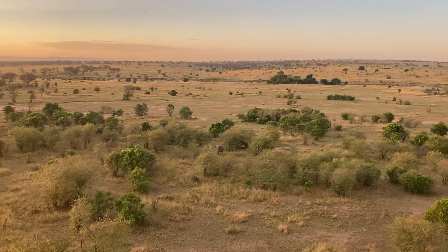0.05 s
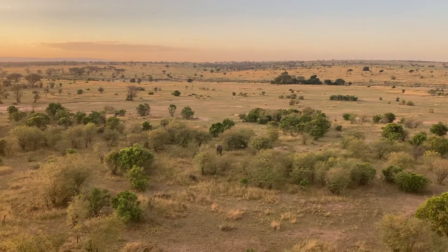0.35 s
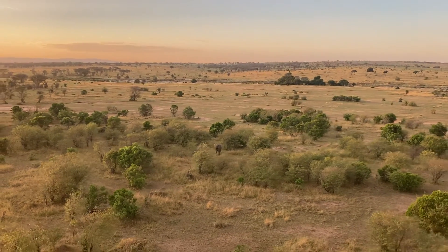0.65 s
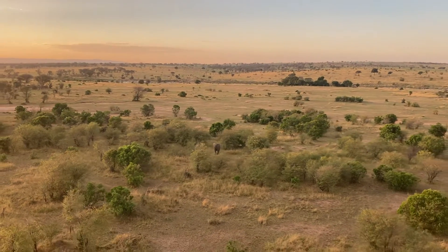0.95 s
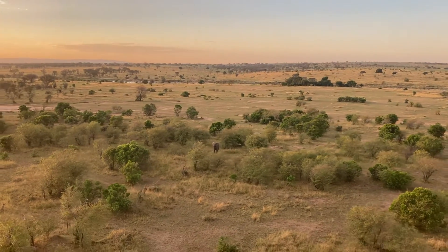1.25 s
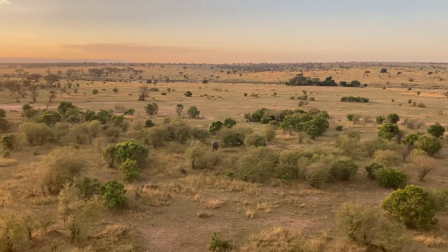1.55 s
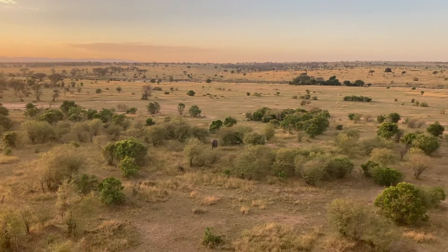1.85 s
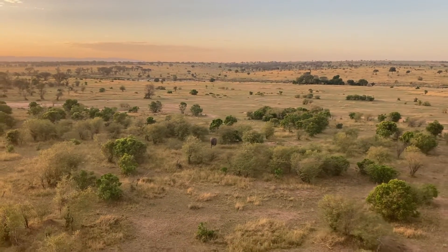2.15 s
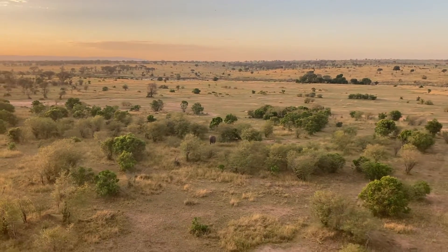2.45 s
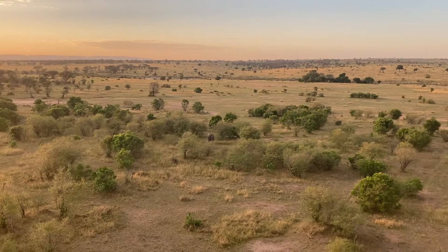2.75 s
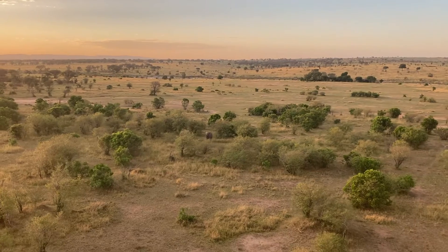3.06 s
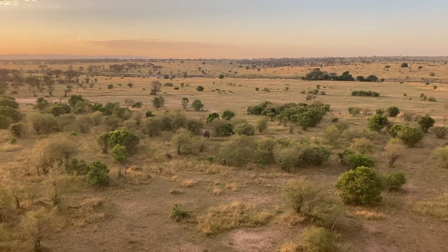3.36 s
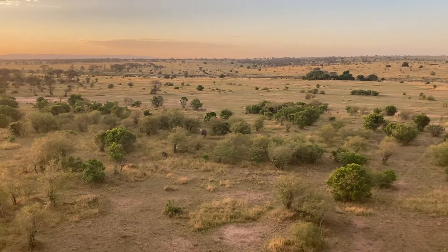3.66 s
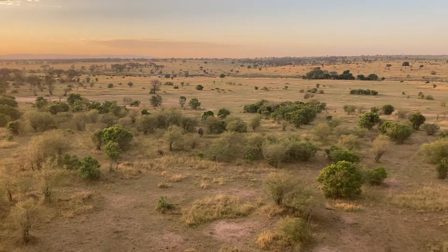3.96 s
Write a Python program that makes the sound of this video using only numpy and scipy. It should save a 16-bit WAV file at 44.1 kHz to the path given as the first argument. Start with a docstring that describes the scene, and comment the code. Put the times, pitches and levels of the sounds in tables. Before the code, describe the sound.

A loud, low gas burner roar builds with hissing and a few hollow pops, close above a balloon basket outdoors. Before it come a soft fluttering pilot flame, a brief creak, light ticks and a spitting valve.

```python
"""A hot-air balloon's main burner opens overhead: the gas jet hisses, catches with a few pops and swells
into a steady, low, turbulent roar. Before that, as the basket drifts over open grassland, the pilot
flame murmurs and flutters, the wicker slips with a creak, a metal fitting ticks, and a valve snaps
and spits gas."""
import sys
import numpy as np
from scipy import signal
from scipy.fft import rfft, irfft
from scipy.io import wavfile
from scipy.ndimage import uniform_filter1d

SR = 44100
rng = np.random.default_rng(int(sys.argv[2]) if len(sys.argv) > 2 else 0)


def wrap_up_sound(samples):
    """Save the sound to the file named by the first command line argument, as 16-bit audio."""
    columns = np.atleast_2d(samples).T
    # keep every value between -1 and 1, then stretch to whole-number steps
    tamed = np.clip(columns, -1, 1)
    steps = np.round(tamed * 32767).astype(np.int16)
    wavfile.write(sys.argv[1], SR, steps)


N = 176400
T = np.arange(N) / SR
FREQS = np.maximum(np.fft.rfftfreq(N, 1 / SR), 1)

# left-right coherence of pilot flame and basket knock: freq_hz, coherence
NEAR_COHERENCE = [(60, 0.59), (140, 0.84), (260, 0.96), (500, 0.62), (1100, 0.28), (1600, 0.34),
                  (6000, 0.27)]
# their left-side phase lead: freq_hz, lead_rad
NEAR_LEAD = [(90, 0.4), (250, 0.68), (480, 1), (900, 3), (1400, -2.5), (2100, 7), (3000, 8.5)]


def undb(db):
    """Decibels to gain."""
    return 10 ** (np.asarray(db) / 20)


def unit(x):
    """Scale to unit rms."""
    return x / np.sqrt(np.mean(x ** 2))


def over_hz(points):
    """Interpolate freq_hz, value points on a log-frequency axis."""
    hz, value = np.array(points, float).T
    return np.interp(np.log(FREQS), np.log(hz), value)


def swell(points):
    """Gain from time_s, level_db points; silent before the first."""
    time_s, level_db = np.array(points, float).T
    return undb(np.interp(T, time_s, level_db)) * (T >= time_s[0])


def noise(spectrum):
    """Unit-rms coloured noise, independent left and right."""
    return unit(irfft(rfft(rng.standard_normal((2, N))) * undb(over_hz(spectrum)), N))


def place(pair, coherence, lead):
    """Blend two independent noises into one stereo source."""
    a, b = rfft(pair)
    likeness = np.clip(over_hz(coherence), 0, .999)
    mid, side = a * np.sqrt((1 + likeness) / 2), b * np.sqrt((1 - likeness) / 2)
    return irfft(np.array([(mid + side) * np.exp(1j * over_hz(lead)), mid - side]), N)


def split(x, hz):
    """Parts below and above hz."""
    low = irfft(rfft(x) / (1 + (FREQS / hz) ** 6), N)
    return low, x - low


def walk(rate_hz):
    """Smooth random wander, unit rms."""
    hold = max(int(SR / rate_hz), 2)
    steps = np.repeat(rng.standard_normal(N // hold + 1), hold)
    return unit(uniform_filter1d(steps, hold)[:N])


def burst(start_s, decay_s, attack_s=0.0007):
    """Quick rise, exponential fall."""
    age_s = np.maximum(T - start_s, 0)
    return (1 - np.exp(-age_s / attack_s)) * np.exp(-age_s / decay_s)


def pilot():
    """The pilot flame murmurs, flutters and hums in the burner can; its gas jet hisses faintly."""
    # spectra of the flame's parts: freq_hz, density_db
    murmur_spectrum = [(18, -27), (45, -1), (65, 1), (120, 0.5), (200, -8.5), (262, -6), (325, -13.5),
                       (420, -15), (520, -12.5), (700, -17), (860, -20.5), (1020, -24), (1300, -32.5),
                       (1620, -32.5), (1790, -26.5), (1980, -32), (2250, -29), (2480, -36), (2800, -41.5),
                       (3060, -35.5), (3380, -36.5), (3600, -41), (4000, -50)]
    murmur_treble = [(4900, -53), (6500, -57.5), (12000, -72), (15000, -82)]
    hum_spectrum = [(150, -39), (225, -7.5), (260, -3.5), (290, -9), (330, -31), (700, -74)]
    flutter_spectrum = [(18, -44), (42, 4.5), (65, 1.5), (110, -3.5), (200, -16), (500, -68), (3000, -110)]
    hiss_spectrum = [(2000, -21), (4200, -3), (4950, -1), (5900, -14), (9000, -21)]
    # envelopes: time_s, gain_db
    bass_gain = [(0, 1.5), (.85, 0), (.92, -10), (1.12, -3), (1.25, -2.5), (2.2, 1), (2.6, -4)]
    hum_gain = [(0, -51.5), (.65, -53.5), (.78, -48), (1.4, -51), (2.6, -50), (4.0, -23)]
    hiss_gain = [(0, -80), (1.9, -76.5), (2.25, -76), (2.55, -81), (4.0, -82)]
    # low flutters: centre_s, length_s, level_db
    flutters = [(0.093, 0.038, -40), (0.272, 0.042, -35), (0.461, 0.029, -30.5), (0.61, 0.028, -38.5),
                (0.733, 0.078, -34.5), (1.758, 0.12, -37.5), (2.08, 0.049, -34)]
    bass, rest = split(noise(murmur_spectrum + murmur_treble), hz=100)
    murmur_db = -42 + 0.97 * walk(rate_hz=7.35)
    murmur = (bass * swell(bass_gain) + rest) * undb(murmur_db)
    hum = swell(hum_gain) * noise(hum_spectrum)
    flutter_gain = sum(undb(level_db) * np.exp(-2 * ((T - centre_s) / length_s) ** 2)
                       for centre_s, length_s, level_db in flutters)
    flutter = flutter_gain * place(noise(flutter_spectrum), coherence=[(60, 0.76)], lead=[(60, 0)])
    hiss = swell(hiss_gain) * noise(hiss_spectrum)
    return place(murmur + hum, NEAR_COHERENCE, NEAR_LEAD) + flutter + hiss


def creak():
    """Two soft-edged slips excite the wicker's damped modes over a dull knock of the basket."""
    # slips of the weave: start_s, level_db
    slips = [(0.3335, -40), (0.3393, -39.5)]
    # wicker modes: freq_hz, gain_db, width_hz
    modes = [(393, 1, 71), (520, 1, 35), (1262, -4.5, 80), (1700, -14, 150), (2310, -6, 190),
             (3150, -10, 230)]
    # basket body: freq_hz, density_db
    knock_spectrum = [(150, -23), (300, 4), (500, 5), (620, 1), (1000, -47)]
    rise_s, spread_rad = 0.0021, 0.8
    sag = .02  # fractional pitch drop per slip as the weave slackens
    knock = place(noise(knock_spectrum), NEAR_COHERENCE, NEAR_LEAD)
    out = undb(-37) * burst(slips[0][0], decay_s=.012, attack_s=0.0016) * knock
    for k, (start_s, level_db) in enumerate(slips):
        age_s = T - start_s
        fall_s = rise_s * np.logaddexp(0, 2 * age_s / rise_s) / 2  # age, softly floored at zero
        rise = np.exp(-((age_s - fall_s) / rise_s) ** 2)
        for freq_hz, gain_db, width_hz in modes:
            phase = rng.uniform(0, 2 * np.pi) + rng.standard_normal((2, 1)) * spread_rad
            tone = np.sin(2 * np.pi * freq_hz * (1 - k * sag) * age_s + phase)
            out += undb(level_db + gain_db) * rise * np.exp(-np.pi * width_hz * fall_s) * tone
    return out


def fitting():
    """A metal fitting ticks: tiny scrapes, the louder ringing briefly, the faintest thin and bright."""
    # contacts: start_s, scrape_db, ring_db, scrape_decay_s, tilt_db_per_octave
    ticks = [(.775, -60, -90, .002, 2), (.822, -57, -63, 0.017, 1), (0.913, -51, -52.5, 0.012, 0.5),
             (1.278, -64, -90, 0.0078, 6)]
    # metal modes: freq_hz, gain_db, t60_s
    modes = [(3311, -10, 0.22), (3840, -15, .07), (5400, 0, 0.092), (5430, -5, .05), (6498, -4, .07),
             (6837, -6, 0.09), (7200, -11, .08), (7359, -6, .05), (11300, -2, 0.056), (11280, 1, 0.046),
             (11410, -7, .035)]
    # scrape before tilt: freq_hz, density_db
    scrape_spectrum = [(1500, -7), (3500, 5), (5000, -4), (7000, 8), (8000, -14), (10700, -4), (12500, -19),
                       (15000, -24)]
    out, age_s = np.zeros((2, N)), T[:SR // 2]
    for start_s, _, ring_db, _, _ in ticks:
        i = int(start_s * SR)
        for freq_hz, gain_db, t60_s in modes:
            phase = rng.standard_normal((2, 1)) * min(freq_hz / 4000, 2)
            envelope = undb(ring_db + gain_db - 60 * age_s / t60_s)
            out[:, i:i + len(age_s)] += envelope * np.sin(2 * np.pi * freq_hz * age_s + phase)
    for start_s, scrape_db, _, decay_s, tilt in ticks:
        tilted = [(hz, db + tilt * np.log2(hz / scrape_spectrum[0][0])) for hz, db in scrape_spectrum]
        out += undb(scrape_db) * burst(start_s, decay_s) * noise(tilted)
    return out


def valve():
    """The valve hits its seat and bounces; a puff and spit of gas dulls as it dies away."""
    # seat impacts: start_s, level_db
    clacks = [(1.4198, -34), (1.427, -36.5)]
    # crack and puff: freq_hz, density_db
    snap_spectrum = [(800, 2.5), (1300, 1), (2000, 0.5), (3000, -5.5), (5500, -6), (7500, 2.5),
                     (10500, 2.5), (12500, 4), (15200, -18)]
    # gas spit bands: low_hz, high_hz, level_db, decay_s
    spit = [(80, 197, -39.5, 0.036), (900, 3050, -52, 0.11), (3780, 6700, -44, 0.071),
            (7300, 12500, -47, 0.026)]
    snap_s = 1.4205
    crack = sum(undb(db) * burst(start_s, decay_s=.0025, attack_s=.0002) for start_s, db in clacks)
    puff = undb(-34) * burst(snap_s, decay_s=.008)
    out = (crack + puff) * noise(snap_spectrum)
    for low_hz, high_hz, level_db, decay_s in spit:
        band = noise([(low_hz / 2, -40), (low_hz, 0), (high_hz, 0), (high_hz * 2, -60)])
        out += undb(level_db) * burst(snap_s, decay_s, attack_s=0.0028) * band
    return out


def frame_reflections(sound):
    """Echoes off the burner frame colour the roar and favour one side or the other."""
    # left echo, right echo: delay_s, gain_db
    echoes = [(.00463, -4), (.00195, -11)]
    # side bias: freq_hz, left_minus_right_db
    balance = [(50, -0.5), (160, -4), (260, -1.3), (350, 2.5), (450, -5), (525, -4.5), (650, 6),
               (800, -5.5), (1010, 7.5), (1150, -0.5), (1370, 5), (1600, -3), (2100, -2), (2600, 1.3),
               (3100, -1.3)]
    sides = undb(np.array([[1], [-1]]) * over_hz(balance) / 2)
    sides /= np.sqrt(np.mean(sides ** 2, axis=0))
    highpass = FREQS / (FREQS + 1500)
    comb = np.array([1 + undb(gain_db) * np.exp(-2j * np.pi * FREQS * delay_s) * highpass
                     for delay_s, gain_db in echoes])
    return irfft(rfft(sound) * comb * sides, N)


def burner():
    """Turbulent, flickering combustion under the jet's hiss; rumble builds as the flame grows tall."""
    # turbulence: freq_hz, density_db
    spectrum = [(20, -35), (40, -1), (85, -3), (125, 1.5), (180, -5.5), (300, -6), (400, -4.5), (520, -12),
                (590, -14), (680, -10.5), (780, -12.5), (980, -22), (1120, -18.5), (1300, -25), (1960, -22),
                (2250, -29), (2650, -26), (2850, -34.5), (3050, -28.5), (3700, -36), (5600, -37),
                (7500, -43.5), (11500, -42.5), (15000, -46.5)]
    # left-right likeness: freq_hz, coherence
    coherence = [(100, 0.99), (420, 0.97), (700, 0.74), (1200, 0.86), (2000, 0.94), (2700, 0.41),
                 (8000, 0.19)]
    # left-side phase lead: freq_hz, lead_rad
    lead = [(60, 0), (150, .2), (250, .55), (430, .35), (600, 1.4), (800, 1.05), (1300, 1.3), (1550, .6),
            (2100, 1.4), (3000, 4.2), (4000, 3.1), (7400, 6.3), (12000, 8)]
    # envelopes as the valve opens: time_s, gain_db
    flame_gain = [(2.55, -49), (2.76, -28.5), (2.85, -22.5), (2.91, -16.5), (2.975, -16.5), (3.005, -11),
                  (3.09, -3.5), (3.25, 1), (3.65, 1), (4.0, 1.2)]
    jet_gain = [(2.6, -73), (2.79, -35), (2.845, -22), (2.895, -18.5), (2.95, -22.5), (2.99, -21),
                (3.005, -15.5), (3.13, -5), (3.25, -1.5), (4.0, -1.5)]
    flame_full_s, build_s, early_rumble_db = 3.23, 0.32, -3.5
    roar = unit(frame_reflections(place(noise(spectrum), coherence, lead)))
    flame, jet = split(roar, hz=1630)
    rumble, body = split(flame, hz=109)
    hiss, top = split(jet, hz=7500)
    build = undb(early_rumble_db * np.clip(1 - (T - flame_full_s) / build_s, 0, 1))
    flicker_db = walk(rate_hz=45)
    flow = swell(jet_gain)
    fire = (rumble * build + body) * swell(flame_gain) * undb(flicker_db)
    gas = (hiss * flow + top * flow ** 1.45) * undb(.5 * flicker_db)  # the top grows faster
    return undb(-13) * (fire + gas)


def pops():
    """Pockets of gas ignite with hollow thuds, the loudest ones higher and shorter."""
    # ignitions: start_s, level_db, pitch_hz, decay_s
    ignitions = [(2.765, -33, 100, 0.024), (2.885, -25.5, 298, 0.021), (2.918, -25.5, 121, 0.017),
                 (3.065, -16, 126, 0.056), (3.192, -3, 360, 0.0094), (3.254, -11, 428, 0.011),
                 (3.562, -15, 115, .018)]
    relative_width = 0.32
    out = np.zeros(N)
    for start_s, level_db, pitch_hz, decay_s in ignitions:
        resonance = 1 / (1 + ((FREQS / pitch_hz - pitch_hz / FREQS) / relative_width) ** 2)
        thud = signal.hilbert(irfft(rfft(rng.standard_normal(N)) * resonance, N))
        envelope = burst(start_s, decay_s, attack_s=.003)
        local_rms = np.sqrt(np.average(abs(thud) ** 2, weights=envelope ** 2) / 2)
        out += undb(level_db) * envelope * thud.real / local_rms
    return out


def scene():
    """All sources as heard from the basket, in open air."""
    return burner() + pops() + pilot() + fitting() + creak() + valve()


def record(dry):
    """Low cut, soft peak limit, high cut."""
    low_cut_hz, high_cut_hz, ceiling = 31, 15800, .95
    x = signal.sosfilt(signal.butter(6, low_cut_hz, "high", fs=SR, output="sos"), dry)
    rounded = x / (1 + (x / ceiling) ** 6) ** (1 / 6)
    return signal.sosfilt(signal.ellip(10, .1, 80, high_cut_hz, fs=SR, output="sos"), rounded)


dry = scene()
out = record(dry)
wrap_up_sound(out)
```